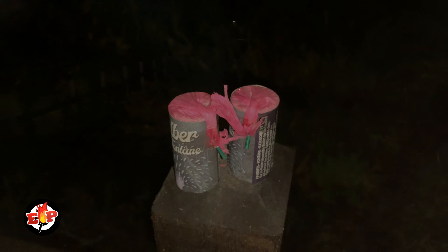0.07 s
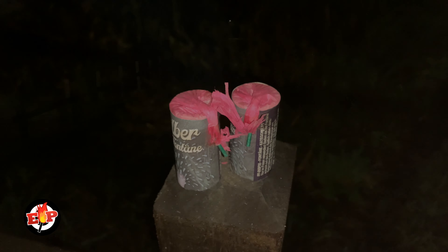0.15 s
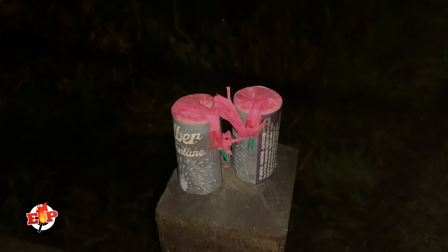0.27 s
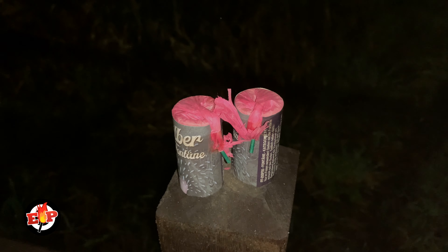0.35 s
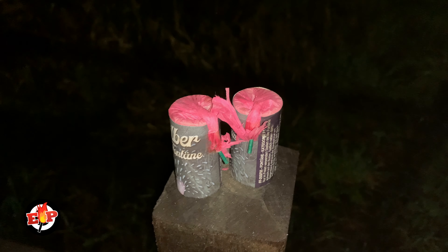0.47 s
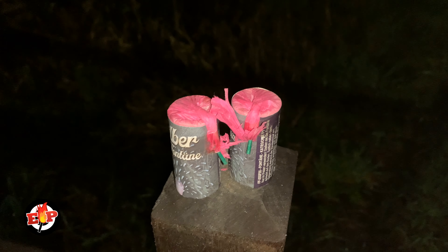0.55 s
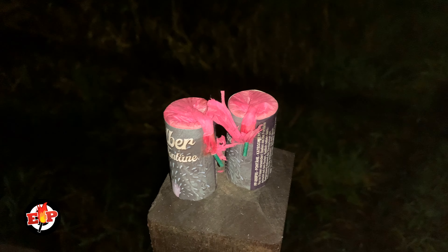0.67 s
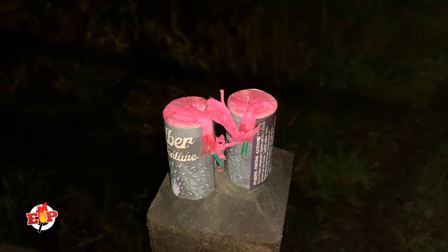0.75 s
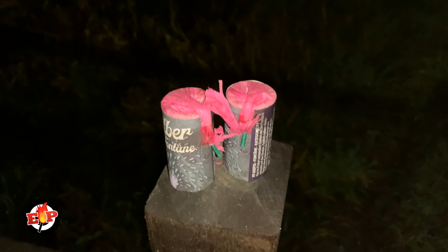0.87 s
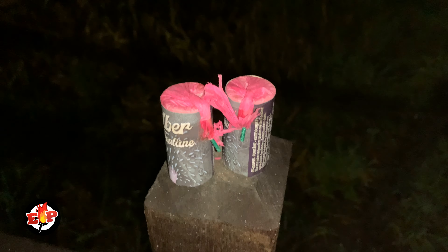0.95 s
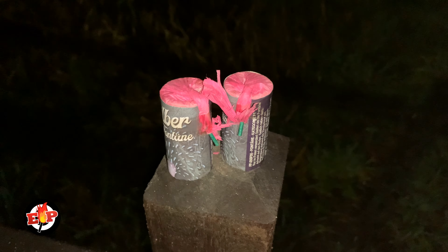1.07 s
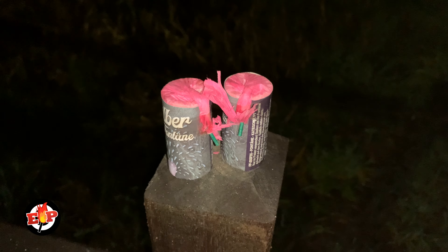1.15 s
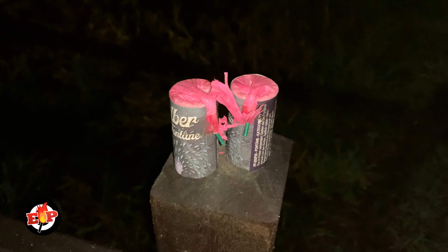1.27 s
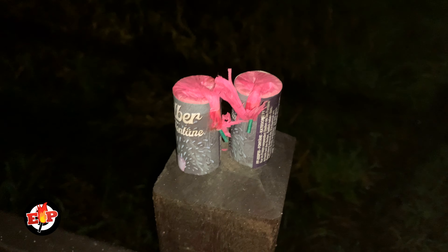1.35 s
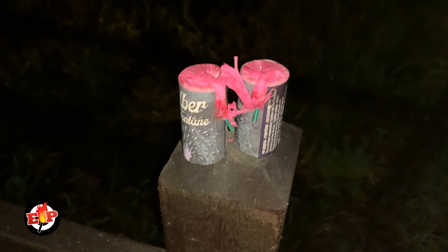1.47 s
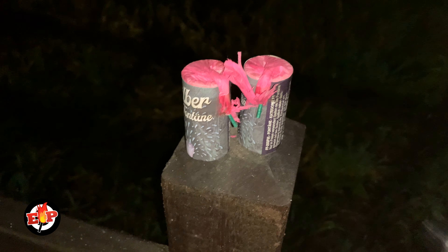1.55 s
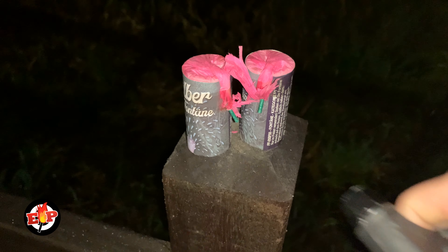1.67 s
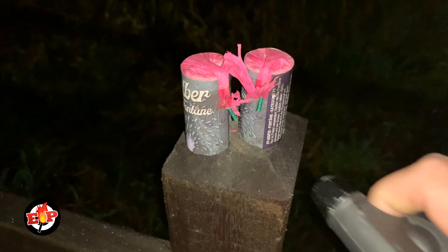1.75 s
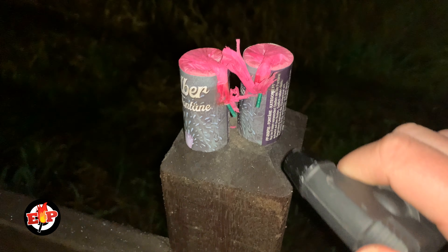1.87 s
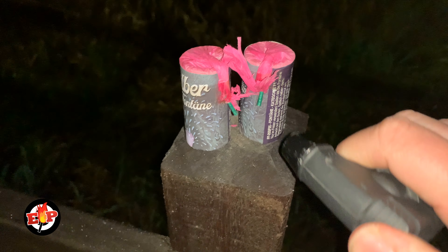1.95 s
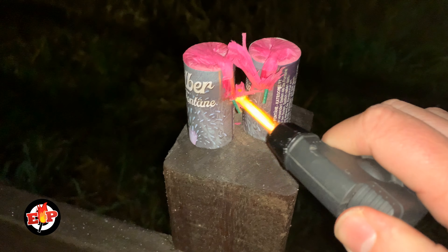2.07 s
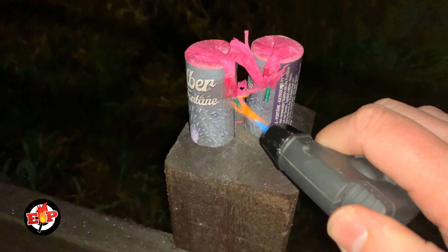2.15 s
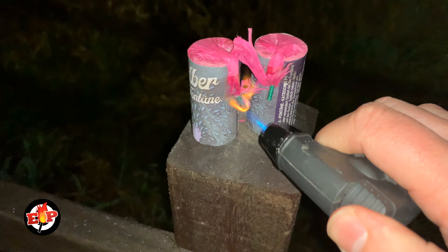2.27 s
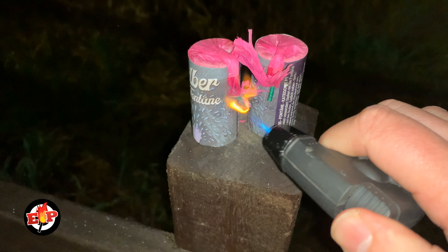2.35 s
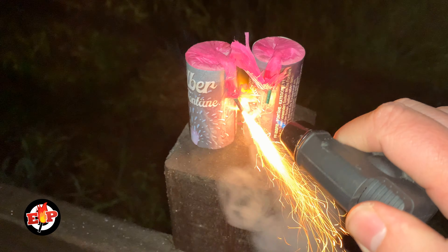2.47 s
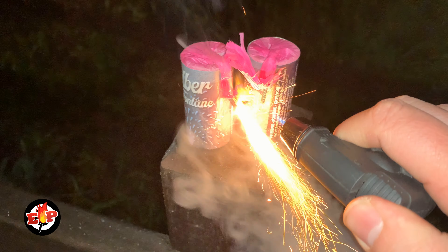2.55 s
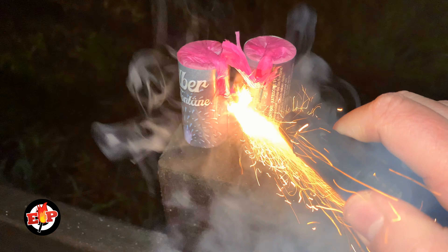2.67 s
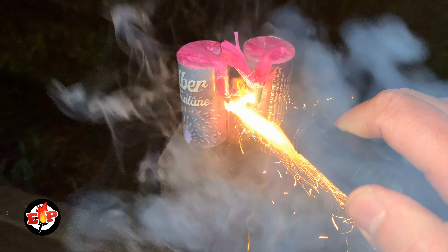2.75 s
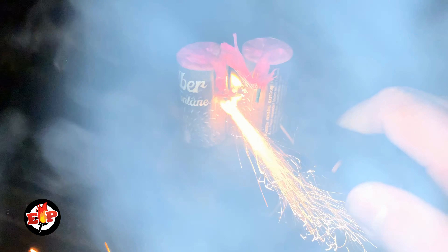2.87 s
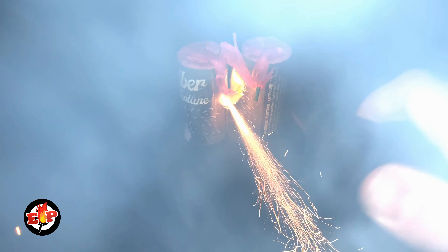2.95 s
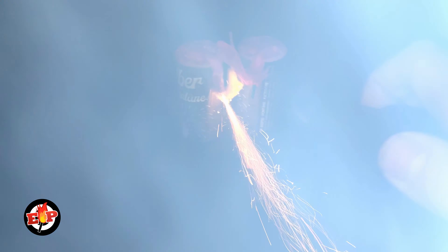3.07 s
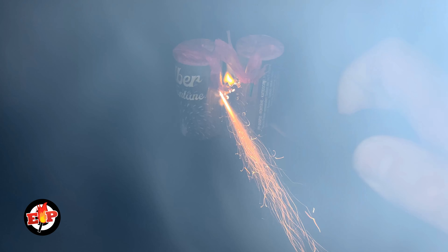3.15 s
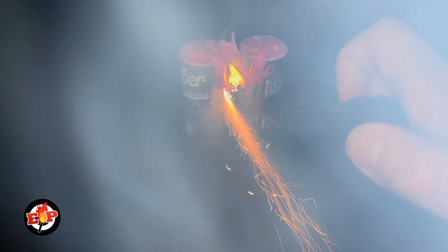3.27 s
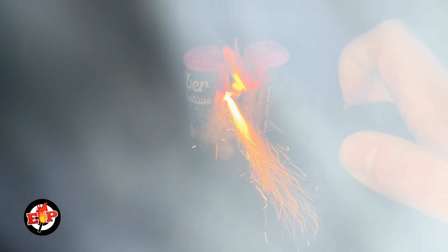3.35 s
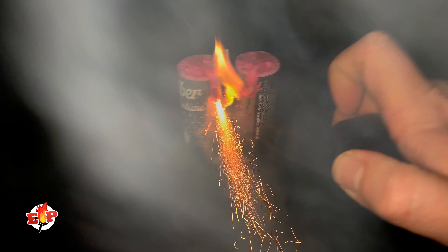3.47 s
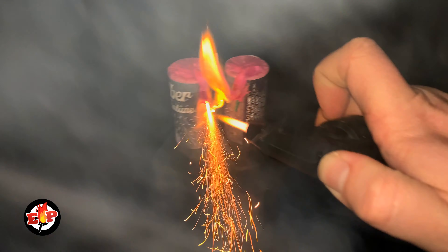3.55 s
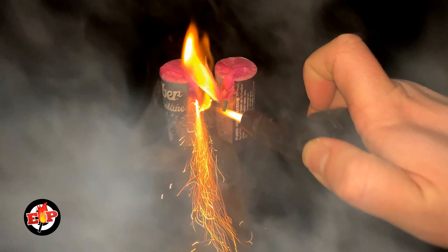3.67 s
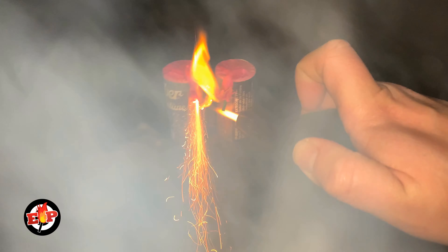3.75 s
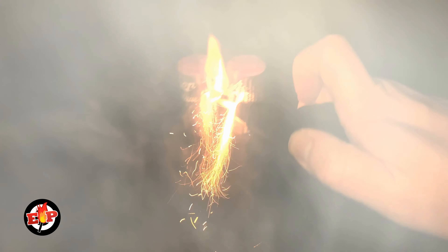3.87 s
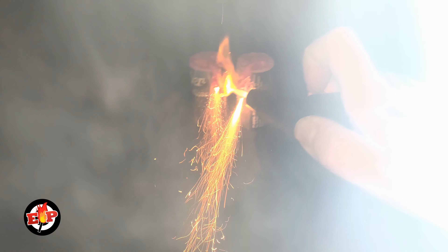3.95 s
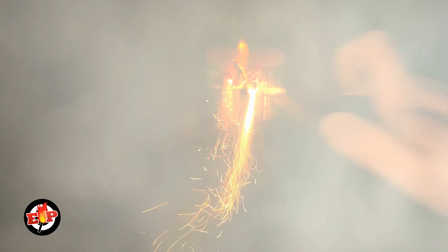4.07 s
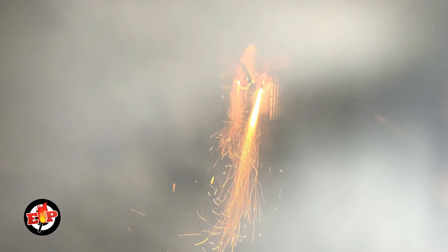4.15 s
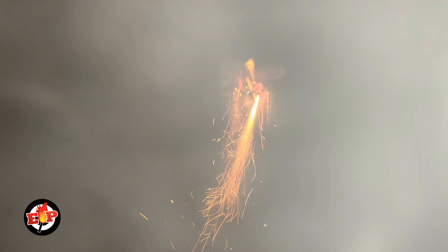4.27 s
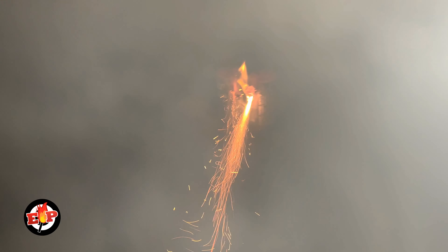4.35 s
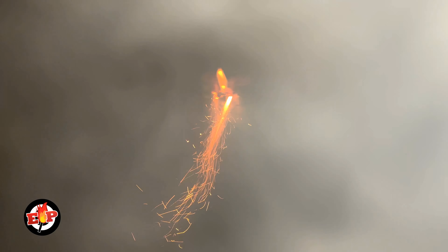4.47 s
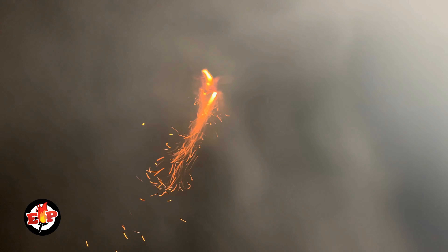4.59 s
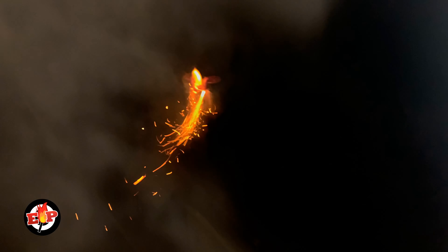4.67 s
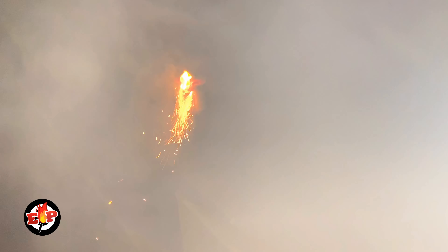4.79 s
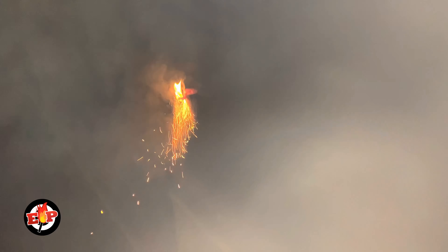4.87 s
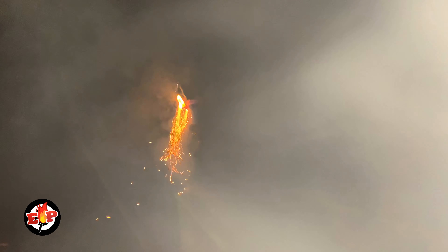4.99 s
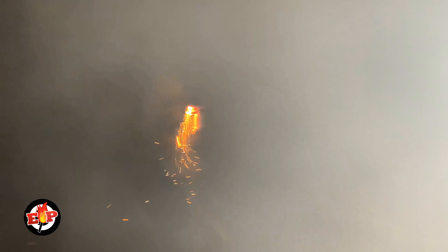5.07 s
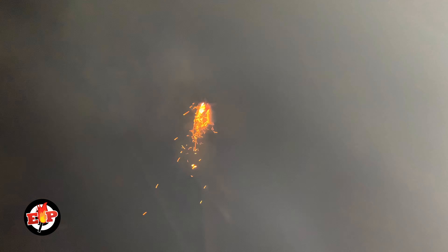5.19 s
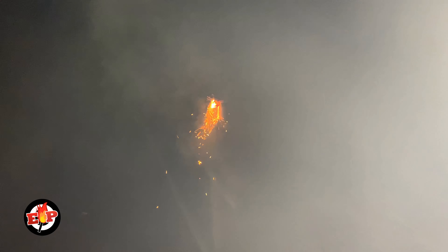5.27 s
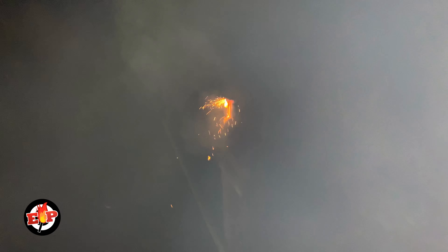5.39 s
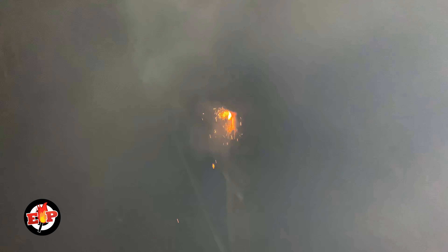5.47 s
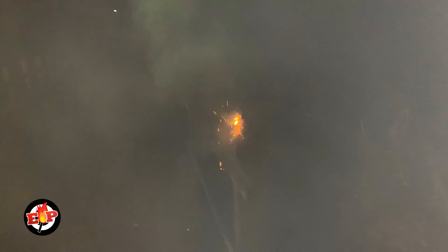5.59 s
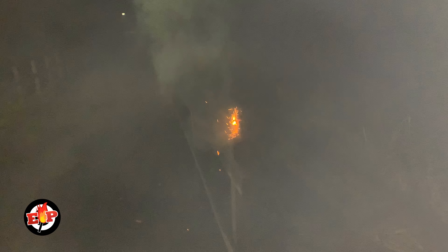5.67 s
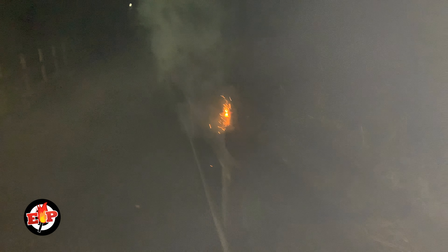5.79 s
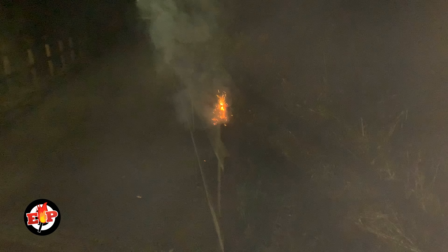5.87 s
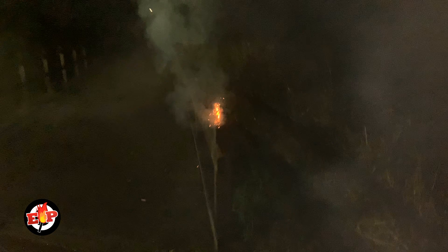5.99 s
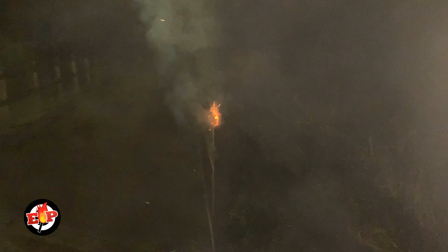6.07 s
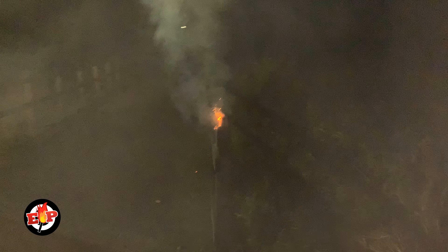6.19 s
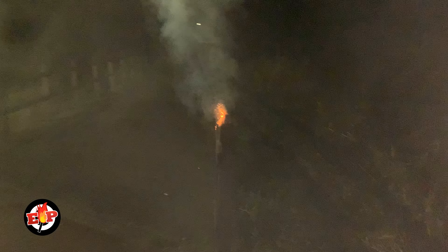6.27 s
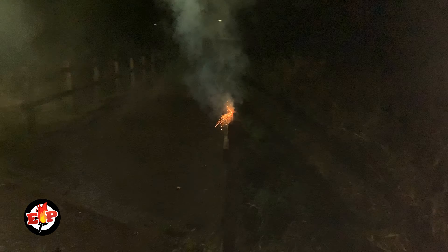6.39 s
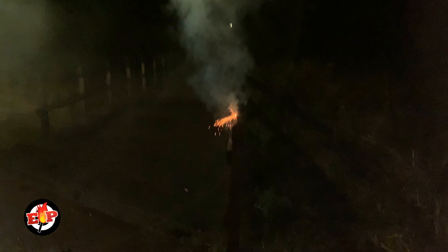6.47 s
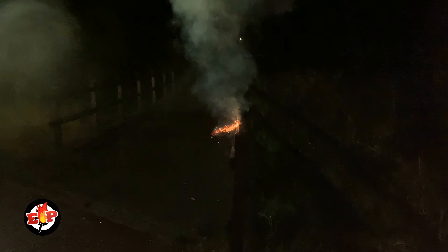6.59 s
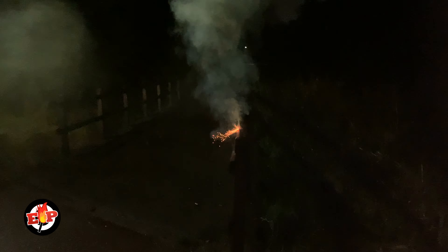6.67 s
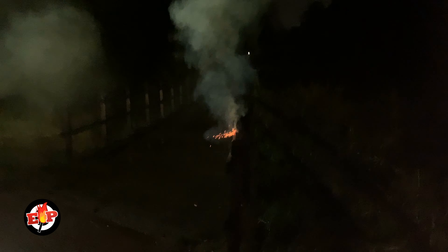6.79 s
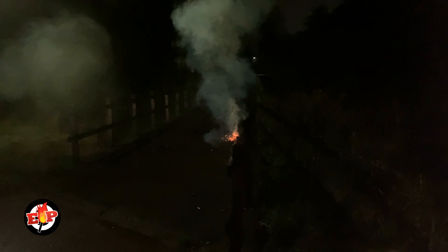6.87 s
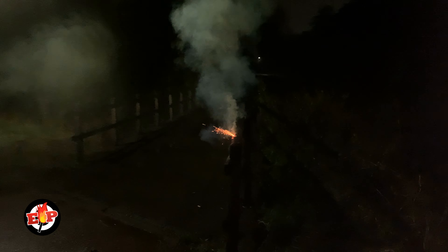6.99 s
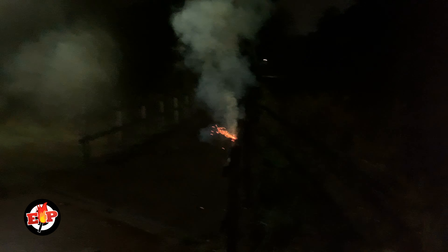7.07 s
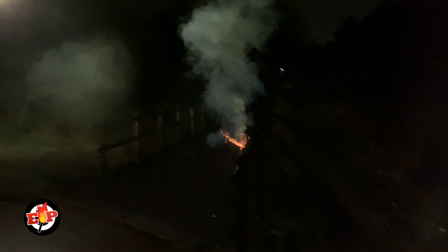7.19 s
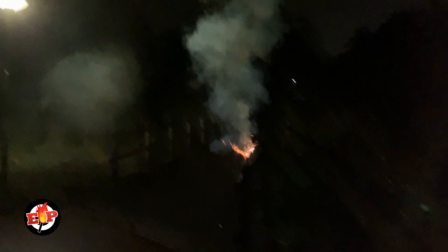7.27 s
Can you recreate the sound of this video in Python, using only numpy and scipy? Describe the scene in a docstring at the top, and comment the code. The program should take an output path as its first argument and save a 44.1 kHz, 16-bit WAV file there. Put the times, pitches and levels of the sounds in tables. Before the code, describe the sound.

A handheld jet lighter hisses and snaps alight, a firework fuse roars and sputters with sharp cracks, then the spark spray fades as the listener backs away.

```python
"""A twin firework fountain is lit on a fence post at night: its fuse sizzles, spits sharp cracks and the
fountain starts to spray. The fire is coloured noise in three bands; each crack is a short noise burst. Before
that a jet lighter clicks in the hand, hisses and snaps alight. The camera backs away from the fire, so it grows
fainter and its echoes shift. Cloth, shoes, low wind and still air are shaped noise, and footsteps, knocks and
the thuds of a crack and a spurt are brief low tones."""
import sys
import numpy as np
from scipy import signal
from scipy.fft import rfft, irfft, next_fast_len
from scipy.io import wavfile
from scipy.ndimage import uniform_filter1d, map_coordinates

SR = 44100
rng = np.random.default_rng(int(sys.argv[2]) if len(sys.argv) > 2 else 0)


def output_pcm(signal):
    """Save a mono or channel-first signal as 16-bit PCM at the path in sys.argv[1].

    Samples are clipped to [-1, 1] before scaling.
    """
    pcm = np.clip(np.atleast_2d(signal).T, -1, 1) * 32767
    wavfile.write(sys.argv[1], SR, np.round(pcm).astype(np.int16))


N = 323253
TIME = np.arange(N) / SR  # s

# how alike the fire sounds on the left and right: f/Hz, likeness (0 to 1)
FLAME_LIKENESS = [(60, 0.76), (300, 1), (1400, 0.97), (3100, 1), (7000, 0.79), (15000, 1)]


def burning():
    """Gas roars out of the fuse while grains of powder fizz; the colour shifts as the fire burns on."""
    # tone colour of each stage of the burn: f/Hz, level/dB
    first_fuse = [(59, -36), (100, -6.5), (328, -0.5), (398, -0.5), (442, -2.5), (854, -3.5), (1080, -2.5),
                  (1170, -3), (2750, -6), (3470, -4.5), (5190, -12.5), (6420, -7), (8460, -16),
                  (12700, -27), (16000, -30)]
    flare = [(59, -42), (100, -8.5), (260, -5.5), (295, -2.5), (433, -2.5), (513, -1.5), (1030, -4.5),
             (1610, -2), (2220, -4.5), (3400, 0), (5530, -17), (6290, -11.5), (12400, -11.5), (14400, -15),
             (16000, -24)]
    both_fuses = [(59, -36), (100, -22), (135, -8.5), (492, -1.5), (583, -8), (634, -2.5), (910, -3.5),
                  (1010, -3.5), (3250, -1.5), (4020, -4.5), (4570, -9), (5650, -5), (10000, 1), (14400, 1),
                  (16000, -12)]
    last_fuse = [(76, -45), (130, -13), (207, -9.5), (274, -10), (342, -7.5), (625, -8.5), (765, -6.5),
                 (1290, -8.5), (1640, -6.5), (1890, -7.5), (2890, -4), (5620, -16.5), (10900, -5),
                 (13300, -8), (16000, -14.5)]
    fountain = [(120, -30), (200, -6.5), (491, -4), (538, -6.5), (709, -6), (836, -5), (1020, -4),
                (1180, -7), (1870, -5.5), (2510, -5), (3690, -7), (7010, -4.5), (12200, -2.5), (15100, -7),
                (16000, -17)]
    # stages, each taking over from the last, levels at 1 m before spurts and flicker:
    # start t/s, handover/s, roar/dB, hiss/dB, fizz/dB
    stages = [(2.335, 0.17, -48, -57, -62.5), (2.88, 0.32, -48, -55, -52.5), (3.83, 0.2, -47, -50.5, -45.5),
              (4.48, 0.33, -50, -51.5, -44.5), (5.47, 0.13, -54.5, -56, -52)]
    # the powder flares up in spurts: start t/s, length/s, rise of roar/dB, of hiss/dB, of fizz/dB
    surges = [(2.38, 0.21, -3, -2.5, 3), (2.664, 0.25, 3, 3, 3), (3.635, 0.22, -1.5, 6, 7),
              (3.774, 0.14, -2.5, -4, 4), (5.04, 0.32, 1, 5, 6.5), (5.303, 0.24, -0.5, 3, 4),
              (5.7, 0.31, -0.5, -0.5, 5), (5.947, 0.48, -2.5, -2.5, 2.5), (6.352, 0.32, 1.5, 3, 6.5),
              (6.56, 0.077, 5.5, 2, 7), (6.87, 0.21, 3.5, 2, 7), (7.036, 0.45, 1, 2.5, -2.5)]

    roar_hiss_fizz_hz = ((0, 4500), (4500, 9000), (9000, SR))
    reached = [np.clip((TIME - start) / handover, 0, 1) for start, handover, *_ in stages]
    reached.append(0)  # nothing takes over from the fountain
    layers = 0
    for k, colour in enumerate([first_fuse, flare, both_fuses, last_fuse, fountain]):
        fade_in = np.sin(np.pi / 2 * reached[k])
        fade_out = np.cos(np.pi / 2 * reached[k + 1])
        level = amp(stages[k][2:])[:, None, None]
        fire = noise(colour, FLAME_LIKENESS, grain_db=0.87, bands=roar_hiss_fizz_hz)
        layers = layers + fire * level * fade_in * fade_out

    surge_db = 0
    for start, length, *rise_db in surges:
        surge_db = surge_db + np.outer(rise_db, between(start, start + length, rise=0.055, fall=0.058))
    # a quick sputter and a slower waver
    sputter_db = 0.66 * drift(90) + 1.06 * drift(14)
    flame = (layers * amp(surge_db + sputter_db)[:, None]).sum(axis=0)
    return shade_left(flame, depth=0.39 * (1 - reached[-2]))  # the shade goes as the fountain starts


def spurt():
    """A brief bright spurt of noise as the fire takes hold of the second fuse."""
    # f/Hz, level/dB
    colour = [(500, -19), (3000, -7.5), (5500, -17.0), (8000, -2.5),
              (10300, 1.0), (11700, 0.0), (13000, -18), (16000, -16)]
    start_s, rise_s, decay_s, level_db = 4.065, 0.038, 0.049, -36  # level at 1 m
    age = TIME - start_s
    rise = np.clip(age / rise_s, 0, 1)
    decay = np.exp(-np.maximum(age - rise_s, 0) / decay_s)
    return amp(level_db) * rise * decay * noise(colour, FLAME_LIKENESS, grain_db=3.5)


def at_camera(flame):
    """Distance sets the flame's level, its side and the lag of its echoes."""
    # the camera backs away from the post: t/s, distance/m
    backing_away = [(3.7, .42), (4.35, .52), (4.67, .65), (5.2, .98), (5.67, 1.62), (6.1, 2.09),
                    (6.85, 2.75), (7.33, 2.98)]
    distance, = curves(backing_away)
    # the flame lies to the right, less so from further off: -3 dB left against right at 1 m
    direct = flame / distance * panned(-3 / distance)

    # the fuse swings about, so the paths by way of the two tubes and the post wander
    tubes = 0
    for lag_s in (.0008, .0013, .0019):
        tubes = tubes + echo(direct, lag_s * (1 + .09 * drift(2)), db=-20)
    post_m = .52 * (1 + .04 * drift(2.5))

    # the narrow post throws back only the short waves, and mostly to a listener close by
    short_waves = direct - uniform_filter1d(direct, size=7, axis=1)
    post_reach_m = 1.05
    treble = short_waves / (1 + (distance / post_reach_m) ** 4)
    post = bounce(treble, distance, post_m, db=-9.5)
    ground = bounce(direct, distance, image_m=2.55, db=-7)
    return direct + tubes + post + ground


def bounce(x, distance, image_m, db):
    """The echo from the flame's mirror image, image_m to the side: its lag shrinks as the camera backs away."""
    sound_m_per_s = 343
    path = np.hypot(distance, image_m)
    return echo(x, (path - distance) / sound_m_per_s, db) * distance / path


def cracks():
    """Pockets of powder burst in the fuse: each gives a sharp noise burst and a puff of gas."""
    # t/s, level/dB, length/s, left against right/dB, gas puff level/dB
    pockets = [(2.9277, -21.5, 0.00084, -7, -42), (3.1114, -3.5, 0.00083, -2, -17),
               (3.384, -32.5, 0.00087, -1, -50), (3.489, -5, 0.0011, -4.5, -35),
               (3.538, -35.5, 0.0033, -8, -50)]
    # tone colour of a crack: f/Hz, level/dB
    crack_colour = [(100, -31), (300, -15), (1300, -23), (2000, -6), (2400, 3), (2750, 6.5), (3050, 1),
                    (3550, -20), (4600, -6.5), (5900, 3), (7200, -3.5), (8400, 5.5), (9800, -10.5),
                    (11800, 3.5), (13200, 0.5), (14400, -2), (16000, -29)]
    out = np.zeros((2, N))
    for s, db, length, side_db, puff_db in pockets:
        crack = bang(length, crack_colour, ring_db=-1.0, ring_s=0.00166, apart=0.76)
        add(out, s, amp(db) * panned(side_db) * crack)
        add(out, s, puff(puff_db, push_s=0.00069))
    return outdoors(out, echo_s=0.0059, echo_db=-24, scatter_db=-15.5, t60=0.082)


def singeing():
    """Single grains crackle at the tip of the fuse before it catches: random clicks with a short ring."""
    # tone colour of one grain: f/Hz, level/dB
    grain_colour = [(1000, -25), (4000, 0), (9000, -2), (16000, -10)]
    start_s, end_s, grains_per_s, level_db, spread_db = 2.21, 2.37, 820, -60, 13
    strikes = rng.random(N) < grains_per_s / SR
    strengths = amp(spread_db * np.minimum(rng.exponential(1, N), 3))
    crackle = evened(signal.oaconvolve(strikes * strengths, causal(grain_colour))[:N])
    return amp(level_db) * crackle * between(start_s, end_s) * panned(-12)


def lighter():
    """Gas hisses and whistles faintly, the striker snaps and knocks the case, and the jet flame burns."""
    # tone colours of gas flow, open nozzle, jet flame and striker: f/Hz, level/dB
    gas_colour = [(300, -15), (650, -6), (1100, -4), (1800, -5), (2200, -4.5), (2650, 0), (3100, -10),
                  (3700, -16), (6000, -24)]
    nozzle_colour = [(3500, -21), (6500, 6.5), (10000, 5), (13000, 6), (16000, 2)]
    torch_colour = [(88, -44), (150, -14), (286, -2), (555, 0), (637, 3), (2360, -3), (3490, -7.5),
                    (5250, -15), (6140, -9.5), (10600, -11), (16000, -17)]
    snap_colour = [(180, -7.5), (300, -20), (900, -20), (1640, -7), (2070, -17), (2400, -5), (2850, -3),
                   (3400, -24), (4090, -7), (5900, -4.5), (6410, 0), (7690, 5.5), (8640, -8.5), (9880, 4.5),
                   (10900, -2.5), (14000, -3.5), (16000, -54.5)]
    # flow starts, the nozzle opens, the striker snaps, the flame goes out
    flow_s, nozzle_s, strike_s, out_s = 1.55, 1.775, 2.0567, 2.42

    # a thin, slightly unsteady tone near 655 Hz
    whistle = np.sin(2 * np.pi * np.cumsum(655 + 3 * drift(40)) / SR) * amp(1.2 * drift(26.7))
    whistle *= amp(-71.5) * between(flow_s, strike_s, rise=0.054, fall=.1)
    # once the nozzle is open, the flow noise sags by 59 dB per second
    flow_db = -65 - 59 * np.maximum(TIME - nozzle_s, 0)
    flow = amp(flow_db) * between(flow_s, strike_s, rise=0.044) * noise(gas_colour)
    hiss = amp(-69.5) * noise(nozzle_colour) * between(nozzle_s, strike_s, rise=0.012)
    # the nozzle nears the post, so its echo draws closer
    lag_s = .00062 - .0003 * (TIME - nozzle_s)
    gas = flow + hiss + echo(hiss, lag_s, db=-9) + whistle

    lit = between(strike_s, out_s, rise=0.011)
    flame = amp(-56.5) * noise(torch_colour, grain_db=2.0) * amp(1.1 * drift(140)) * lit * panned(-8.0)

    snap = np.zeros((2, N))
    click = bang(.0013, snap_colour, ring_db=-3, ring_s=0.0014, apart=0.45)
    add(snap, strike_s, amp(-2.5) * panned(-4) * click)
    add(snap, strike_s, puff(-13.0, push_s=0.00033))

    case = np.zeros((2, N))
    t = np.arange(SR // 10) / SR
    knock = np.sin(2 * np.pi * 235 * t) * (t / 0.002) * np.exp(-t / 0.002)
    add(case, strike_s, amp(-18) * knock * panned(-17))
    return gas + flame + case + outdoors(snap, echo_s=0.0044, echo_db=-27, scatter_db=-16.5, t60=0.069)


def handling():
    """Ringing bursts tick in the hand, swells of filtered noise scuff, and grainy noise rustles as cloth."""
    # the lighter clicking in the hand: t/s, level/dB, resonance f/Hz, top f/Hz
    ticks = [(0.3128, -50, 2190, 6000), (.319, -50.5, 2300, 6000), (0.8575, -52.5, 5460, 12100),
             (1.1406, -52, 10000, 14000), (1.2785, -47.5, 1770, 5000), (1.2912, -48.5, 1950, 4500),
             (1.307, -60, 13000, 16000), (1.4082, -59, 4000, 8000), (1.5326, -49.5, 4250, 7000),
             (1.5544, -48, 4020, 14000), (1.557, -44.5, 1750, 12000)]
    # scuffs of sleeves and shoes: t/s, length/s, level/dB, start f/Hz, width/Hz, glide/Hz
    scuffs = [(0.54, 0.097, -66, 1580, 450, 1200), (0.643, 0.046, -58, 450, 1200, 0),
              (.645, 0.041, -66.5, 2300, 1400, 0), (0.737, .02, -68.5, 10300, 2000, 0),
              (0.967, 0.013, -69, 11000, 6000, 0), (1.13, 0.061, -67.5, 10500, 7000, 0),
              (1.124, 0.092, -70.5, 3700, 2000, 0), (1.251, .025, -67.5, 10000, 6000, -1000),
              (1.411, 0.03, -66.5, 7000, 9000, 0), (5.611, 0.039, -53, 1500, 6500, 0),
              (5.998, 0.018, -61, 500, 900, 0), (6.031, 0.019, -58, 700, 1600, 0),
              (6.098, 0.012, -59.5, 1500, 5000, 0), (6.122, 0.017, -61.5, 300, 500, 0),
              (7.076, 0.032, -67, 300, 400, 0)]
    # clothes rustle as the arm moves: start t/s, end t/s, rise/s, fall/s, level/dB
    rustles = [(-.05, 0.553, 0.044, 0.28, -66), (0.37, 0.72, .22, 0.065, -60.5),
               (1.03, 1.31, 0.066, 0.093, -65.5), (1.25, 1.68, 0.12, .1, -73.5)]
    # tone colour of cloth: f/Hz, level/dB
    cloth_colour = [(300, 9), (1000, -0.5), (2500, -1), (5000, -5), (11000, -7), (16000, -5.5)]

    out = np.zeros((2, N))
    for s, db, hz, top_hz in ticks:
        tick = burst(.0012, ring_db=-6, ring_s=.0022)
        passband = signal.butter(2, [1100, np.clip(top_hz, 2000, SR * .45)], "band", fs=SR)
        ringing = tick + amp(10.5) * resonate(tick, hz, width=490)
        rung = signal.lfilter(*passband, ringing)
        # filtering leaves the tick's energy unchanged
        add(out, s, amp(db) * rung * np.linalg.norm(tick) / np.linalg.norm(rung))

    for s, length, db, start_hz, width, glide_hz in scuffs:
        n = round(length * SR)
        hz = start_hz + np.linspace(0, glide_hz, n)
        rub = resonate(rng.standard_normal(SR // 4)[:n], hz, width)
        rub = resonate(rub, hz, width)
        add(out, s, amp(db) * evened(rub * np.hanning(n)))

    strokes = sum(amp(db) * between(*stroke) for *stroke, db in rustles)
    rustle = strokes * noise(cloth_colour, grain_db=2.5)
    return outdoors(out, echo_s=0.0095, echo_db=-36, scatter_db=0, t60=0.073) + rustle


def night():
    """Still air and low wind are noise; footsteps, soft knocks and the thuds of a crack and a spurt are brief
    low tones."""
    # strength of the wind, before a trim and gusts: t/s, level/dB
    wind = [(0.0, -53), (0.96, -63), (4.57, -57.5), (4.82, -65), (5.22, -52), (5.29, -62), (6.2, -52),
            (6.43, -60.5), (7.33, -55)]
    # tone colours of wind and still air: f/Hz, level/dB
    gust_colour = [(8.8, -37), (15, -1.5), (37, 0.5), (60, 3), (113, -8.5), (173, -18.5), (300, -25),
                   (390, -43), (660, -120)]
    air_colour = [(88, -36.5), (150, 0.5), (414, -8.5), (662, -10.5), (1500, -20), (2270, -22), (7920, -30),
                  (9820, -28.5), (12400, -30), (16000, -45)]
    # low thumps: footsteps, soft knocks, the thud of a crack and of a spurt: t/s, length/s, level/dB, f/Hz
    low_thumps = [(0.297, 0.073, -53.5, 110.5), (1.843, 0.03, -48.5, 87), (2.393, 0.029, -50, 103),
                  (3.488, 0.018, -42.5, 139), (4.098, 0.019, -44, 80), (4.313, 0.022, -48, 80),
                  (5.102, .03, -48.5, 110), (5.193, .05, -46.5, 79), (5.62, 0.068, -50.5, 54.7),
                  (6.118, 0.029, -48.5, 133), (6.2, 0.029, -58.5, 189), (6.303, 0.025, -53, 105),
                  (7.075, 0.019, -58, 140)]

    trim_db, gust_db, gusts_per_s = 3.5, 2, 7
    wind_db = curves(wind)[0] + trim_db + gust_db * drift(gusts_per_s)
    out = amp(wind_db) * noise(gust_colour, same=((1, 0.38),))
    out = out + amp(-65.5) * noise(air_colour, same=((1, 0.06),))
    for s, length, db, hz in low_thumps:
        t = np.arange(round(length * SR)) / SR
        tone = np.sin(2 * np.pi * (hz * t + rng.random()))
        add(out, s, amp(db) * evened(np.hanning(len(t)) * tone))
    return out


def bang(length, spectrum, ring_db, ring_s, apart):
    """A burst at the two microphone ports; so close up, each port hears a partly different wave."""
    shared, left, right = [burst(length, ring_db, ring_s) for _ in range(3)]
    pair = np.array([shared + apart * left, shared + apart * right]) / np.hypot(1, apart)
    coloured = signal.fftconvolve(pair, causal(spectrum)[None], axes=1)
    return shade_left(coloured, depth=0.32)


def burst(length, ring_db, ring_s, size=4096, count=6):
    """A dense cluster of shocks with an even spectrum, then a short ring; its energy is that of length s at rms 1."""
    t = np.arange(size) / SR
    shape = np.maximum(t < length, amp(ring_db) * np.exp(-t / ring_s))
    x = rng.standard_normal(size) * shape
    for _ in range(count):  # even out the spectrum while keeping the envelope
        x = irfft(np.exp(1j * np.angle(rfft(x))))
        local_level = np.sqrt(abs(uniform_filter1d(x ** 2, size=24)) + 1e-12)
        x = x * shape / local_level
    return x / np.linalg.norm(x) * np.sqrt(length * SR)


def puff(db, push_s):
    """A small blast of gas: a quick push, then a longer suck."""
    u = np.arange(SR // 50) / SR / push_s
    return amp(db) * (1 - u) * np.exp(-u) * panned(-14)


def shade_left(pair, depth):
    """Sound from close on the right loses its upper middle on the way round to the left port."""
    return np.array([pair[0] - depth * resonate(pair[0], 2940, 1100), pair[1]])


def echo(x, lag_s, db):
    """A reflection whose path changes: it combs the hiss, and the comb slides."""
    late = (TIME - lag_s) * SR
    return amp(db) * np.array([map_coordinates(side, [late], order=3) for side in x])


def outdoors(x, echo_s, echo_db, scatter_db, t60, size=8192):
    """One bounce off the ground and a brief scatter from the fence and grass, fading 60 dB in t60 s."""
    t = np.arange(size) / SR
    # small things throw back mostly the short waves
    tail = np.diff(rng.standard_normal((2, size + 1))) * amp(-60 * t / t60) * (t > .002)
    tail *= amp(scatter_db) / np.linalg.norm(tail[0])
    tail[:, round(echo_s * SR)] += amp(echo_db)
    return x + signal.oaconvolve(x, tail, axes=1)[:, :N]


def noise(spectrum, same=((1, .8),), grain_db=0, bands=((0, SR),)):
    """Stereo noise in the given bands, each of rms 1; grain_db clumps it into tiny bursts."""
    size = next_fast_len(N, True)
    hz = np.fft.rfftfreq(size, 1 / SR)
    a, b = rfft(rng.standard_normal((2, N)) * amp(grain_db * drift(1500)), size)
    likeness = np.clip(read(same, hz), 0, 1)
    right = likeness * a + np.sqrt(1 - likeness ** 2) * b
    pair = np.array([a, right]) * amp(read(spectrum, hz))

    def below(edge):
        """Gain that passes what lies below the edge in Hz."""
        return 1 / (1 + (hz / (edge + 1e-3)) ** 12)

    return np.squeeze([evened(irfft(pair * (below(hi) - below(lo)), size)[:, :N]) for lo, hi in bands])


def drift(per_s):
    """A smooth random wander of rms 1 that picks a new value per_s times a second."""
    knots = rng.standard_normal(N // 16)
    return evened(np.interp(TIME * per_s, np.arange(len(knots)), knots))


def resonate(x, hz, width):
    """A resonance of gain 1 that can follow a moving frequency."""
    turn = np.exp(2j * np.pi * np.cumsum(hz * np.ones(x.shape[-1])) / SR)
    r = np.exp(-np.pi * abs(width) / SR)
    # shift the frequency down to zero, smooth, shift back up
    return 2 * (turn * signal.lfilter([1 - r], [1, -r], x / turn)).real


def causal(spectrum, size=2048):
    """The ring with this spectrum whose energy comes as early as possible (minimum phase); energy 1."""
    log_gain = np.log(amp(read(spectrum, abs(np.fft.fftfreq(size, 1 / SR)))))
    ring = np.fft.ifft(np.exp(np.conj(signal.hilbert(log_gain)))).real
    return ring / np.linalg.norm(ring)


def between(start, end, rise=0.005, fall=0.005):
    """Attack, hold and release, from 0 to 1 and back; times in s."""
    return np.clip((TIME - start) / rise, 0, 1) * np.clip((end - TIME) / fall, 0, 1)


def panned(db):
    """Left and right gains, mean 1, for a left-right level difference."""
    g = np.atleast_1d(amp(db))
    return np.array([g, np.ones_like(g)]) * 2 / (1 + g)


def add(mix, s, sound):
    """Mix a sound in from time s, cut off at the end."""
    part = mix[:, round(s * SR):][:, :sound.shape[-1]]
    part += sound[..., :part.shape[-1]]


def curves(rows):
    """Each column of a table of (t/s, ..) rows, drawn out to every sample."""
    s, *columns = np.transpose(rows)
    return [np.interp(TIME, s, c) for c in columns]


def read(points, hz):
    """Value of a (f/Hz, value) table at any frequency, on a logarithmic frequency scale."""
    f, value = np.transpose(points)
    return np.interp(np.log(hz + 1), np.log(f + 1), value)


def evened(x):
    """Scale to rms 1."""
    return x / np.sqrt(np.mean(x ** 2) + 1e-20)


def amp(db):
    """Decibels to a gain."""
    return 10 ** (np.asarray(db) / 20)


def scene():
    """The fire heard from the moving camera, with the close sounds and the night around it."""
    fire = at_camera(burning() + spurt())
    return fire + singeing() + cracks() + lighter() + handling() + night()


def record(dry):
    """Peaks beyond full scale overload the input and are cut flat; then the top is cut off at 15850 Hz."""
    low_pass = signal.firwin(301, 15850, window=("kaiser", 8), fs=SR)
    return signal.oaconvolve(np.clip(dry, -1, 1), low_pass[None], "same")


dry = scene()
out = record(dry)
output_pcm(out)
```